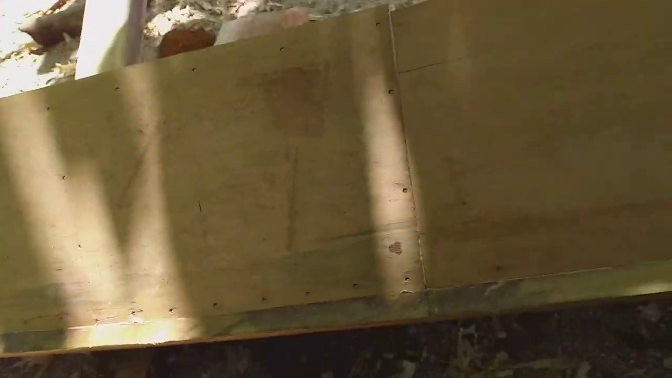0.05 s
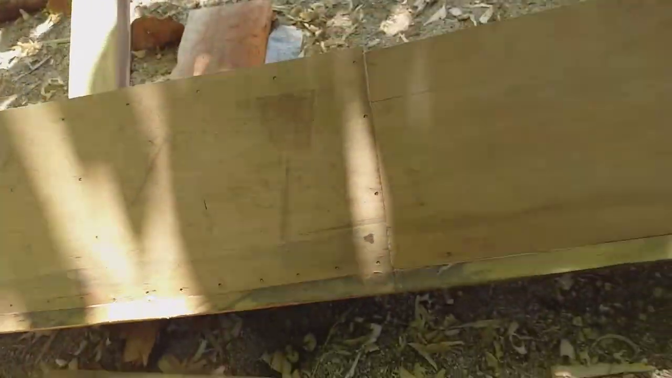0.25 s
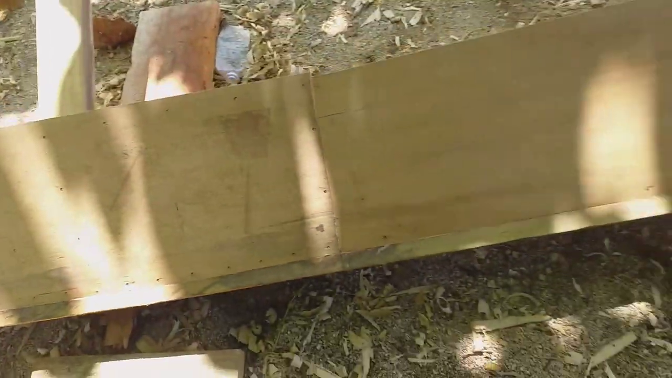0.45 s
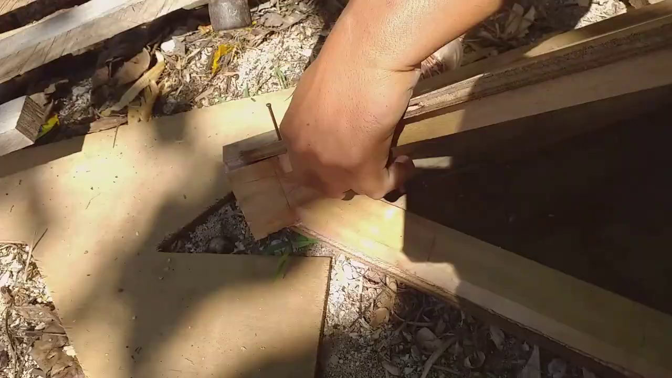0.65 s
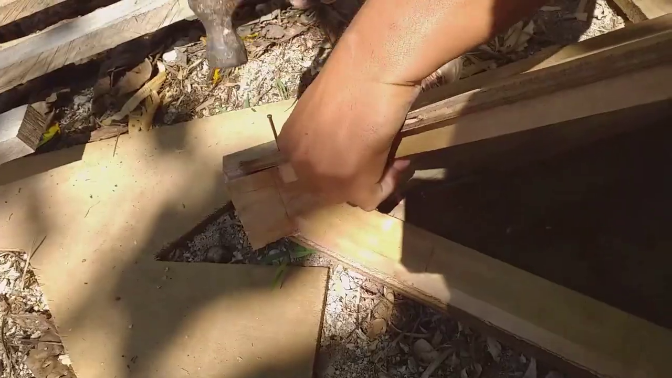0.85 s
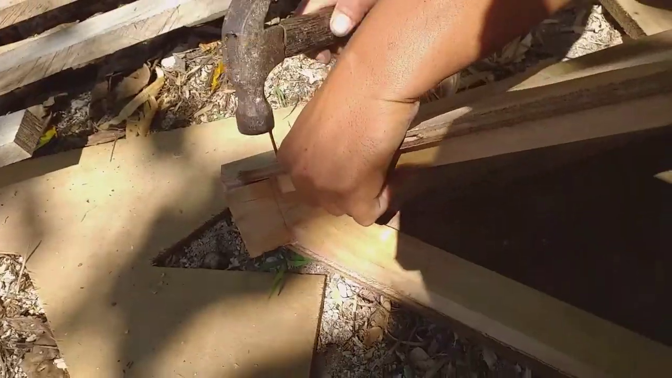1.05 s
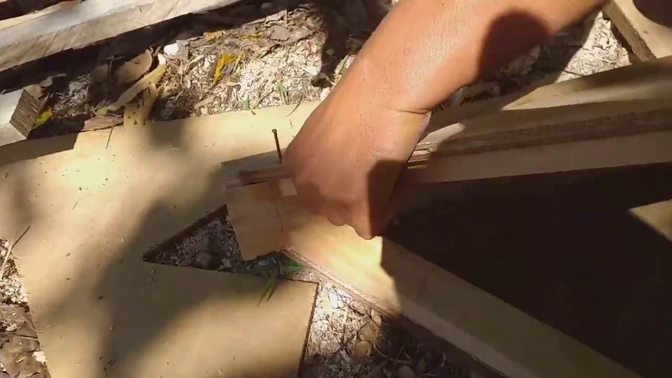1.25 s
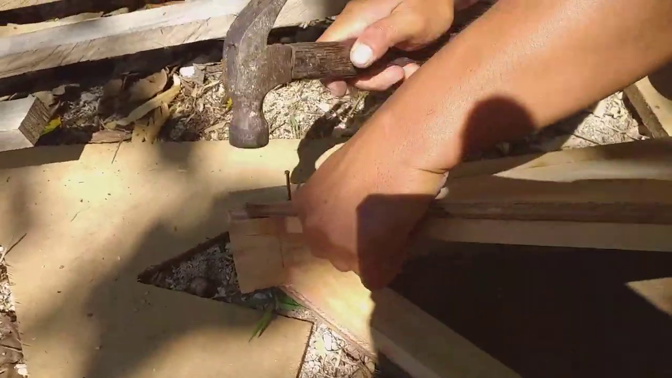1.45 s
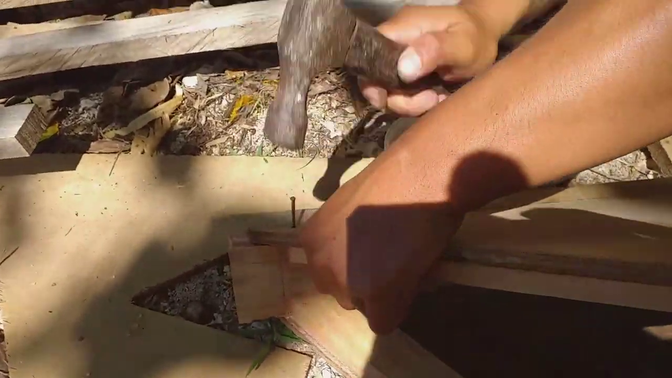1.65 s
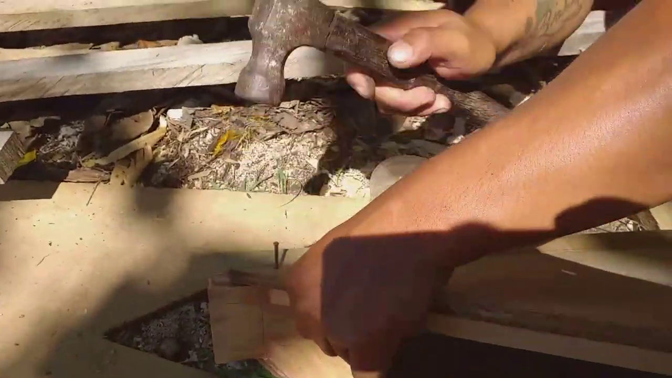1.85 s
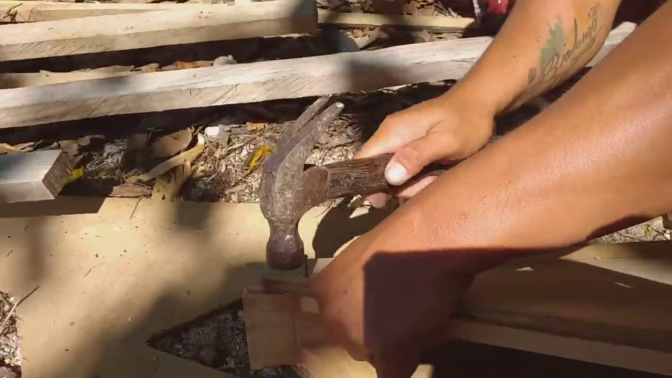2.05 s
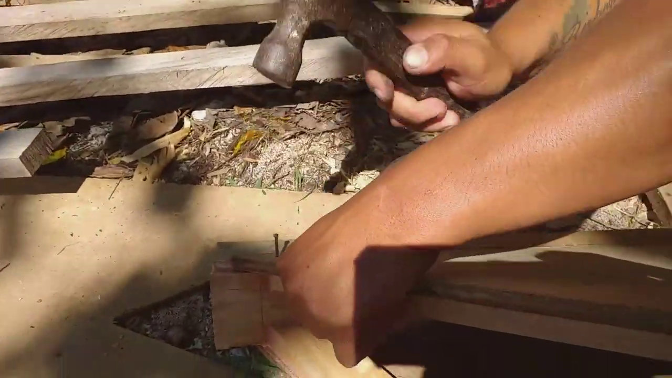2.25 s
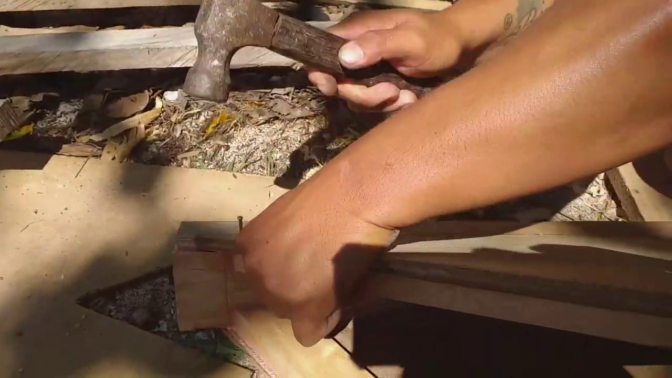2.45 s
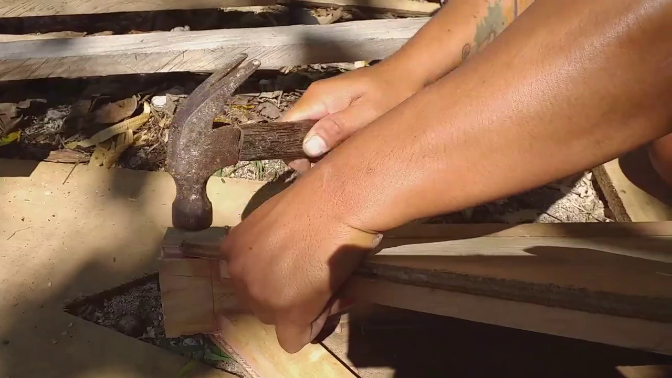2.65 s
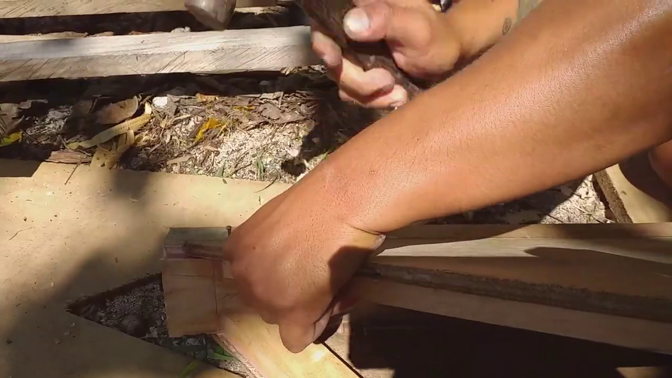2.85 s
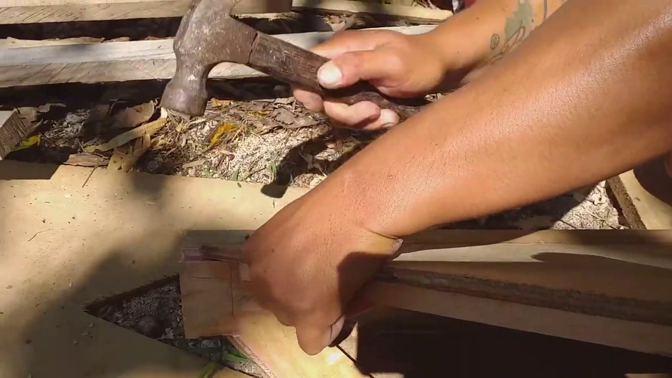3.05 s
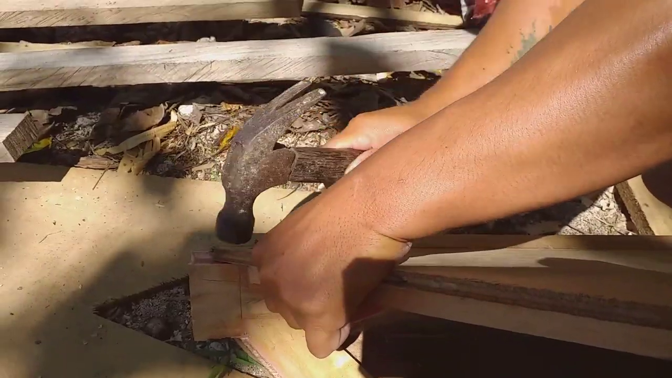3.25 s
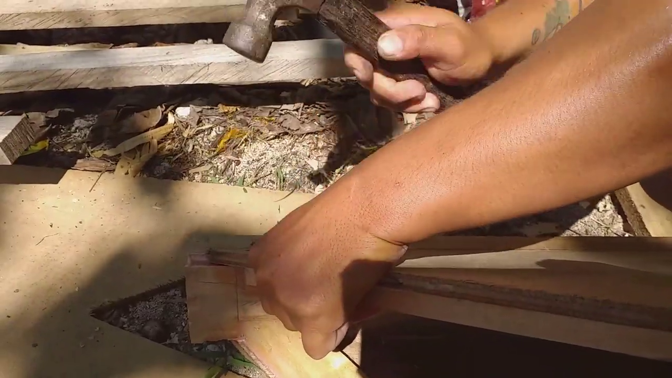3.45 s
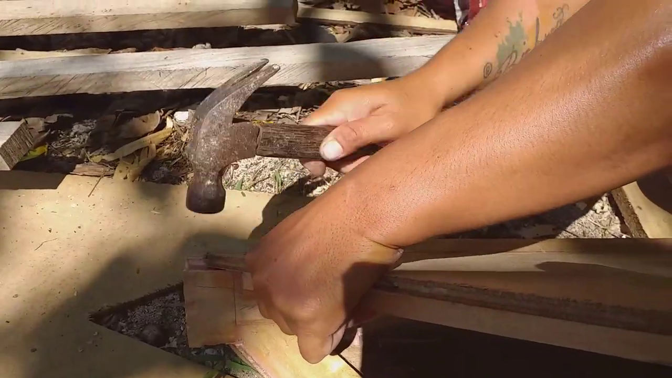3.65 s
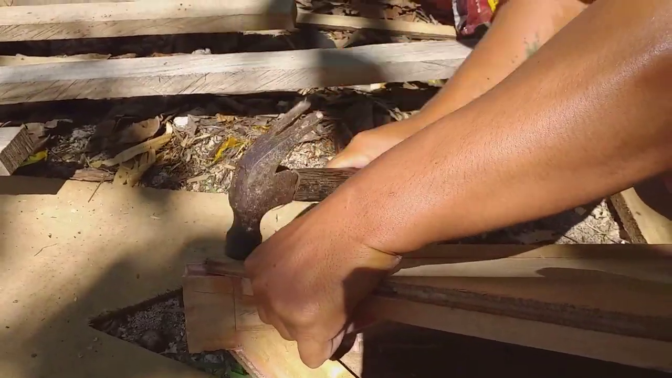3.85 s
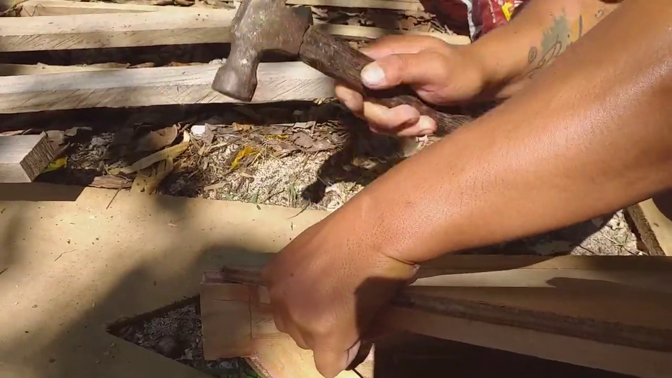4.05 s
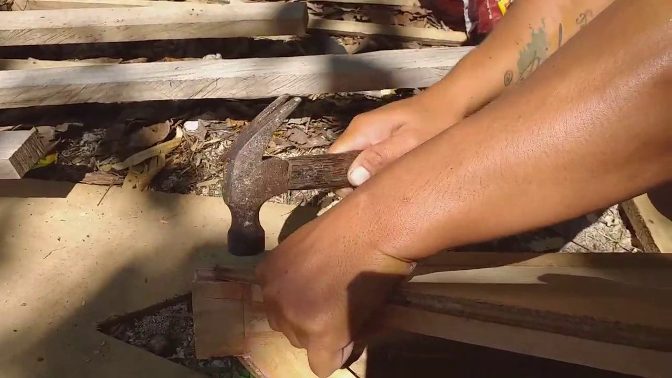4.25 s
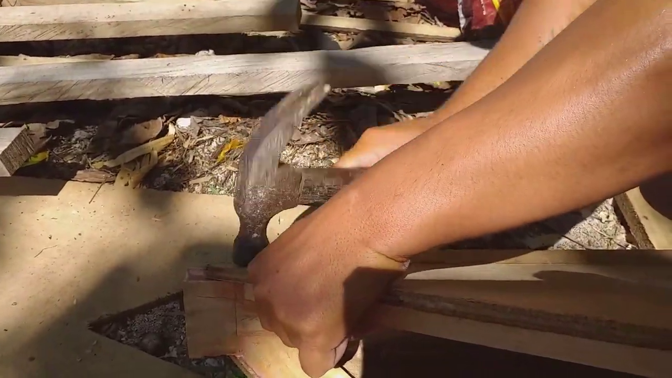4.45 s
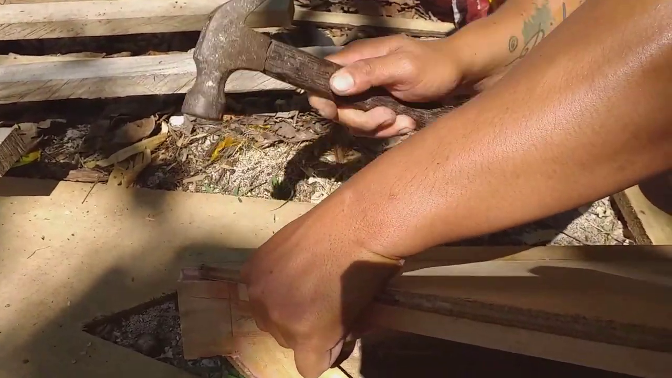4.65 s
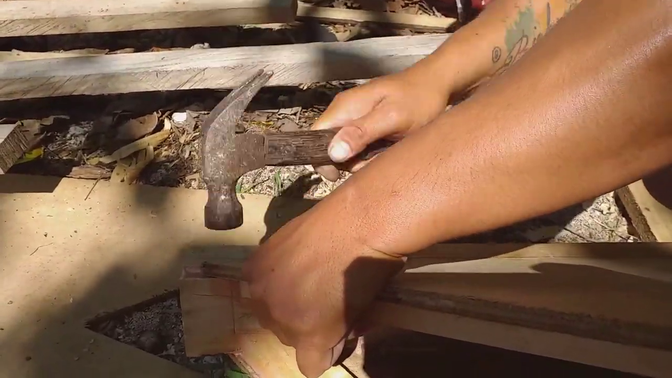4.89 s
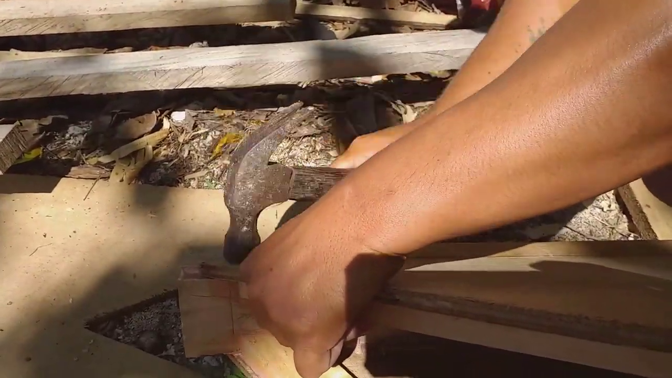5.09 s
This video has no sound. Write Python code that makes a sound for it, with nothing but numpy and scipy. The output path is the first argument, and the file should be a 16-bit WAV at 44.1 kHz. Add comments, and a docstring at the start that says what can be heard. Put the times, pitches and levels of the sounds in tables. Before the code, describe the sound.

Feet rustle briefly in shavings, then close, even hammer strikes crack on a nail and knock through a wooden frame.

```python
"""Hammering a nail into a boat frame

A claw hammer hits a nail about three times a second, close to a small camera in a yard. Each blow is
a crack of steel and a knock of the wooden frame, which loses its bite and answers more deeply as the
nail sinks. Four of the last blows knock twice. At first, someone shuffles through wood shavings and
fingers bump the camera."""
import sys
import numpy as np
from scipy import signal
from scipy.fft import rfft, irfft, next_fast_len
from scipy.io import wavfile
from scipy.ndimage import map_coordinates

SR = 44100
rng = np.random.default_rng(int(sys.argv[2]) if len(sys.argv) > 2 else 0)


def log_audio(samples):
    """Write samples as a 16-bit WAV file to the path given in sys.argv[1]."""
    # one column per channel
    frames = np.atleast_2d(samples).T
    # limit to full scale, then quantise
    limited = np.clip(frames, -1, 1)
    pcm = np.round(limited * 32767).astype(np.int16)
    wavfile.write(sys.argv[1], SR, pcm)


N = 225770
TIME = np.arange(N) / SR  # seconds since the start
AGE = np.arange(SR // 2) / SR  # seconds since a hit

# Table levels compare rows; each layer adds its own gain. A decay is the time to fade by 60 dB.
# hammer blows: (time [s], crack [dB], thud [dB], frame [dB], hollow ring [dB], block [dB], steel [dB])
BLOWS = [(0.756, -10.5, -41.5, -11, -14.5, -29.5, -52.5), (1.0682, -7, -39.5, -19, -11.5, -24, -51),
         (1.3871, -7, -42.5, -19, -13, -25.5, -49), (1.7092, -6.5, -42, -21, -19, -30, -46),
         (2.0296, -7.5, -23, -17.5, -24.5, -19.5, -48.5), (2.337, -8, -32, -12, -17, -21, -37.5),
         (2.6397, -7.5, -28.5, -13.5, -19, -19.5, -31), (2.9423, -7.5, -30, -19, -18.5, -9.5, -26),
         (3.2683, -8, -25.5, -14.5, -12.5, -21, -29), (3.5839, -5.5, -25.5, -12, -8, -20, -35),
         (3.8896, -7.5, -33.5, -10.5, -7, -16.5, -41), (4.1913, -8.5, -22, -8, -8, -14.5, -41.5),
         (4.4956, -6, -26, -11, -8.5, -14.5, -49), (4.7991, -5.5, -30.5, -7, -5, -16, -39.5),
         (5.1137, -8, -39, -5, 1, -12.5, -47.5)]
# second hits once the nail is nearly in: (time [s], frame [dB], clack [dB])
REBOUNDS = [(3.9116, -17, -14), (4.2094, -16, -19), (4.5119, -15.5, -20.5), (4.8174, -15.5, -17)]
# the tones that struck things ring with: (pitch [Hz], level [dB], decay [s])
WOOD_TONES = [(102, -20, 0.16), (136, -13.5, 0.23), (158, -11.5, 0.2), (196.6, -5, 0.086), (236.5, 6, 0.12),
              (259.9, -2.5, 0.16), (347.2, 8, .09), (381.8, 0, 0.17), (391.6, 3.5, 0.12),
              (468.5, -2.5, 0.093), (531.8, 9, 0.074), (583, 6.5, 0.049), (686, -9, 0.086), (775, 0, .05),
              (845, 1, .06), (900, -1, .06), (968, -3, .055), (1065.3, 7.5, 0.053), (1143, -1, 0.032),
              (1375, -4, .06), (1636, 2, 0.05), (1907, -6, 0.068), (2060, -7.5, 0.073)]  # the frame and the nailed block
PING_TONES = [(4942, 3, .11), (5938, 8, .125)]  # ringing steel
CLINK_TONES = [(3895, -5, 0.026), (4900, -11, 0.01), (5000, -4, 0.023), (6300, -11, 0.038),
               (6910, -12, 0.048), (7810, -7.5, 0.033), (11630, -24, 0.031), (12300, -17, .025)]  # the nail and hammer face, which stop quickly
# how long each part of a noise burst lasts: (frequency [Hz], decay [s])
CRACK_DECAYS = [(500, 0.1), (2000, 0.033), (5000, 0.023), (12000, 0.02)]
ECHO_DECAYS = [(100, 0.32), (400, 0.2), (1000, .2), (5000, .22), (12000, .19)]
# noise colours, or how strong a noise is from low to high: (frequency [Hz], level [dB per Hz])
CRACK_COLOUR = [(150, -27.5), (600, -14), (1100, -3.5), (1700, -9), (2700, -5), (3200, -8), (4000, 1),
                (5500, 2), (7700, 1.5), (9200, -15), (12000, -7), (15500, -9)]  # steel hitting steel
NEAR_ECHO_COLOUR = [(60, -19), (150, 3), (280, 12), (420, -3), (700, -12.5), (1700, -3.5), (2600, -9.5),
                    (4000, -2.5), (7600, -2.5), (9200, -16.5), (15000, -11)]  # sound scattered by the yard
FAR_ECHO_COLOUR = [(30, -18), (85, 20), (200, -2), (450, -10.5), (1000, -9), (2500, -7.5), (5000, -2.5),
                   (7800, -5), (9200, -16.5), (15000, -18.5)]  # sound coming back from farther off
SCRAPE_COLOUR = [(150, -22.5), (400, -4), (900, -5), (1600, -2), (2400, -6), (4000, -20)]  # the low part of a dragging foot
RUSTLE_COLOUR = [(1500, -28.5), (2600, -5), (4500, 1), (7800, 1.5), (9500, -23), (14000, -42)]  # shifting shavings
FIZZ_COLOUR = [(6000, -25), (9000, -5.5), (13000, 0.5), (15500, -7)]  # their highest hiss
SNAP_COLOUR = [(500, -13), (1500, -4.5), (3500, 0), (7000, 2.5), (9500, -14.5), (15000, -16)]  # a breaking chip
RUMBLE_COLOUR = [(25, -20.5), (55, -4), (130, -4), (220, -15), (400, -26.5), (900, -43.5)]  # a hand on the camera
AIR_COLOUR = [(15, -28.5), (25, 2), (91, 0.5), (722, -26), (2120, -13), (2300, -23), (2700, -11.5),
              (2920, -10), (3340, -16.5), (8130, -16), (9050, -31), (15500, -26)]  # quiet outdoor air
# feet dragging through shavings: (time [s], half length [s], rustle [dB], fizz [dB])
FOOT_DRAGS = [(0.027, 0.028, -41, -58), (0.142, 0.061, -44, -64), (0.255, .02, -56, -41),
              (0.335, 0.016, -43.5, -34), (0.422, 0.31, -43.5, -48), (.57, 0.016, -42.5, -47),
              (0.695, 0.086, -42, -45.5)]
# chips breaking: (time [s], level [dB])
CHIP_SNAPS = [(0.041, -45), (0.114, -47), (0.168, -45), (0.239, -38), (0.326, -39), (0.4668, -23.5),
              (.574, -40.5), (0.645, -38)]
# fingers on the camera body: (time [s], level [dB], pitch [Hz], half length [s])
FINGER_BUMPS = [(0.387, -20, 179, 0.0069), (0.429, -5.5, 166.5, 0.0056), (0.445, -22.5, 108, 0.011),
                (.501, -14, 181, 0.0035), (.521, -20, 129, 0.01), (0.582, -4.5, 152, 0.0044),
                (.603, -21, 160, 0.0048), (0.696, -21.5, 164, 0.0073)]
# rumble of the hand moving the camera: (time [s], level [dB])
RUMBLE_LEVELS = [(0.0, -71), (0.122, -44), (0.298, -40.5), (0.6, -30), (0.622, -32.5), (0.75, -41.5)]
# faint, short swells of high hiss: (time [s], level [dB], centre frequency [Hz], half length [s])
HISS_SWELLS = [(0.177, -35.5, 13300, 0.043), (1.919, -57, 12930, 0.18), (1.917, -61, 6530, 0.095),
               (2.537, -63.5, 5900, .04), (3.83, -66.5, 3440, 0.046), (4.44, -67, 6980, 0.094)]

# Each blow sinks the nail one equal step, and the tone follows: (nail tall [dB], nail fully in [dB])
BITE_DB = (5, -3.5)  # the sharp edge of the crack near 4 kHz
# wood tones, added to the blow's crack level: clunk near 800 Hz, clack near 1 kHz, rap above 1.5 kHz
CLUNK_DB, CLACK_DB, RAP_DB = (-18.5, -9), (-12.5, -15.5), (-9.5, -21.5)
SWAY_DB = -13  # the lowest tones of the frame, at any nail depth
SETTLE_S, STILL_S = 0.745, 0.79  # shuffle, rumble and whirr die away between these times


def hammer():
    """Each blow cracks, sets the steel ringing, pushes the whole frame once and knocks the wood."""
    out = np.zeros(N)
    depths = np.linspace(0, 1, len(BLOWS))
    for depth, (start, crack_db, thud_db, frame_db, hollow_db, block_db, steel_db) in zip(depths, BLOWS):
        bite_db, clunk_db, clack_db, rap_db = [
            np.interp(depth, [0, 1], ends) for ends in (BITE_DB, CLUNK_DB, CLACK_DB, RAP_DB)]
        crack = amp(crack_db) * steel_crack(bite_db)
        ping = amp(steel_db + 5.5) * ring(PING_TONES, scatter_db=1, detune=0.0003).sum(axis=0)
        thud = amp(thud_db + 18) * rise(0.002) * fade(0.037) * np.sin(2 * np.pi * 88 * AGE)
        wood = wood_knock(SWAY_DB, frame_db, hollow_db, block_db,
                          crack_db + clunk_db, crack_db + clack_db, crack_db + rap_db, build_cycles=0.93)
        echo = amp(crack_db) * yard_echo()
        add(out, start, crack + ping + thud + wood + echo)
    return out


def steel_crack(bite_db):
    """Steel hits steel with a burst of noise and a short clink. A tall nail gives it more bite."""
    def bite(hz):
        return bite_db * bell(np.log(hz / 3800), 0, 0.34)

    burst = noise_burst([(hz, db + bite(hz)) for hz, db in CRACK_COLOUR], CRACK_DECAYS)
    tones = [(hz, db + bite(hz), decay) for hz, db, decay in CLINK_TONES]
    clink = ring(tones, scatter_db=1, detune=0.041).sum(axis=0)
    return rise(0.0013) * (amp(8) * burst + amp(-1) * clink)


def wood_knock(sway_db, frame_db, hollow_db, block_db, clunk_db, clack_db, rap_db, build_cycles):
    """The wood rings with many tones. Long, low waves need more time to spread through the frame."""
    hz = np.transpose(WOOD_TONES)[0][:, None]
    # strength of each group of tones: (pitch [Hz], level [dB])
    frame = [(165, sway_db), (235, frame_db), (270, frame_db),
             (345, (frame_db + hollow_db) / 2 - 1.65), (380, hollow_db), (450, hollow_db)]
    block = [(520, block_db), (620, block_db), (760, clunk_db), (920, clunk_db),
             (1060, clack_db), (1150, clack_db), (1600, rap_db)]
    strength = amp(value_at(frame + block, hz))
    direction = (-1) ** np.arange(len(hz))[:, None]  # neighbouring tones start opposite ways
    tones = ring(WOOD_TONES, scatter_db=2.5, detune=0.012)
    return np.sum(direction * strength * rise(build_cycles / hz) * tones, axis=0)


def rebounds():
    """The hammer lands again, more softly: only wood sounds, with a dull echo from the yard."""
    out = np.zeros(N)
    dull_colour = [(100, -10), (330, -1), (600, -12), (1300, -17), (2200, -20.5), (4000, -36)]
    for start, frame_db, clack_db in REBOUNDS:
        wood = wood_knock(frame_db, frame_db, frame_db, frame_db - 2.5,
                          clack_db - 0.5, clack_db - 1, clack_db - 7.5, build_cycles=1)
        echo = amp(frame_db - 7) * rise(0.02) * noise_burst(dull_colour, ECHO_DECAYS)
        add(out, start, wood + echo)
    return out


def yard_echo():
    """Timber and ground scatter a blow back; a fainter echo comes from farther off."""
    near = amp(-13.5) * rise(0.018) * noise_burst(NEAR_ECHO_COLOUR, ECHO_DECAYS)
    far = amp(-35) * rise(0.04) * fade(0.65) * noise(FAR_ECHO_COLOUR, len(AGE))
    return near + far


def shuffle():
    """Each drag of a foot makes a swell of tiny crackles in the shavings."""
    when, half_length, rustle_db, fizz_db = np.transpose(FOOT_DRAGS)[:, :, None]
    swells = bell(TIME, when, half_length)
    rustle = np.sum(amp(rustle_db) * swells, axis=0)
    fizz = np.sum(amp(fizz_db) * swells, axis=0)
    scrape = rustle * amp(2.5 - 14 * TIME)  # grows fainter over the opening
    crackle_db = 2.7 * wobble(450)  # a random level, nearly steady, shared by all three layers
    out = np.zeros(N)
    for level, colour in (scrape, SCRAPE_COLOUR), (rustle, RUSTLE_COLOUR), (fizz, FIZZ_COLOUR):
        flicker = amp(crackle_db + 1.6 * wobble(70))
        out += level * normalise(flicker * noise(colour, N))
    return out


def snaps(crackles_per_s=30):
    """Chips snap, and single shavings break underfoot at random moments."""
    out = np.zeros(N)
    for start, db in CHIP_SNAPS:
        add(out, start, amp(db + 8.5) * fade(0.021) * noise(SNAP_COLOUR, len(AGE)))
    for when, size in rng.random((round(crackles_per_s * SETTLE_S), 2)):
        crackle = fade(0.008) * noise([(1500, -15), (6000, -0.5), (14000, -3.5)], len(AGE))
        add(out, when * SETTLE_S, amp(-40.5 + 11 * size) * crackle)
    return out


def finger_bumps():
    """Soft fingertips rock the camera body once or twice, with a short dull tap at the peak."""
    out = np.zeros(N)
    for when, db, hz, half_length in FINGER_BUMPS:
        touch = bell(TIME, when, half_length)
        rocking = np.cos(2 * np.pi * hz * (TIME - when))
        tap = noise([(150, -14), (330, 6), (520, -12.5), (900, -37)], N)
        out += amp(db) * touch * (rocking + amp(-14.5) * touch * tap)
    return out


def hand_rumble():
    """A hand moving the camera makes a low rumble."""
    level_db = np.interp(TIME, *np.transpose(RUMBLE_LEVELS))
    return amp(level_db) * noise(RUMBLE_COLOUR, N)


def squeak():
    """One faint, short squeak at a nearly steady pitch."""
    pitch_hz = 725 + 7 * wobble(30)
    tone = np.sin(2 * np.pi * np.cumsum(pitch_hz) / SR)
    return amp(-40) * bell(TIME, 0.215, 0.047) * tone


def whirr(hz=1588):
    """A faint whirr, made of noise close to one pitch, fades behind the shuffling."""
    colour = [(hz / 1.2, -40), (hz, 0), (hz * 1.2, -40), (hz * 2, -80)]
    return amp(-48.5 - 17 * TIME) * noise(colour, N)


def hiss_swells():
    """Faint, short swells of narrow high hiss come and go."""
    out = np.zeros(N)
    for when, db, hz, half_length in HISS_SWELLS:
        hiss = noise([(hz / 2, -40), (hz / 1.25, -8), (hz, 0), (hz * 1.25, -8), (hz * 2, -40)], N)
        out += amp(db) * bell(TIME, when, half_length) * hiss
    return out


def air():
    """Quiet outdoor air at a nearly steady level."""
    return amp(-68.5 + 1.2 * wobble(4)) * noise(AIR_COLOUR, N)


def ring(tones, scatter_db, detune):
    """Fading tones, one a row. Strength and pitch shift at random, as no two hits land on one spot."""
    hz, db, decay = np.transpose(tones)[:, :, None]
    level_shift, pitch_shift = rng.standard_normal((2, len(hz), 1))
    waves = np.sin(2 * np.pi * hz * (1 + detune * pitch_shift) * AGE)
    return amp(db + scatter_db * level_shift) * fade(decay) * waves


def noise(colour, size):
    """Noise of the given colour, with an average power of 1."""
    padded = next_fast_len(size)
    gains = amp(value_at(colour, np.fft.rfftfreq(padded, 1 / SR)))
    white = rfft(rng.standard_normal(padded))
    return normalise(irfft(white * gains, padded)[:size])


def noise_burst(colour, decays):
    """A burst of noise in which each frequency dies at its own speed."""
    hz, age, bands = signal.stft(noise(colour, len(AGE)), SR, nperseg=128)
    fading = bands * fade(value_at(decays, hz)[:, None], age)
    return signal.istft(fading, SR, nperseg=128)[1][:len(AGE)]


def wobble(rate):
    """A random curve read only over its very start, so it stays close to one random value for the whole sound."""
    return map_coordinates(rng.standard_normal(int(N * rate / SR) + 4), [TIME * rate / SR])


def fade(decay, age=AGE):
    """A fall of 60 dB every `decay` seconds."""
    return np.exp(-np.log(1000) * age / decay)


def rise(seconds):
    """A smooth climb from 0 to 1."""
    return 1 - np.exp(-(AGE / seconds) ** 2)


def bell(x, centre, half_width):
    """A smooth hill that peaks at 1."""
    return np.exp(-((x - centre) / half_width) ** 2)


def value_at(points, hz):
    """Read between (frequency, value) points, with octaves about evenly spaced."""
    frequencies, values = np.transpose(points)
    return np.interp(np.log(hz + 1), np.log(frequencies + 1), values)


def amp(db):
    """Turn decibels into a multiplier."""
    return 10 ** (np.asarray(db) / 20)


def normalise(x):
    """Scale a sound to an average power of 1."""
    return x / np.sqrt(np.mean(x ** 2) + 1e-20)


def add(track, start, sound):
    """Mix a sound into the track at `start` seconds."""
    part = track[max(round(start * SR), 0):][:len(sound)]
    part += sound[:len(part)]


def scene():
    """The hammering and the small sounds around it, over quiet air, in one channel."""
    hammering = hammer() + rebounds()
    settling = np.interp(TIME, [SETTLE_S, STILL_S], [1, 0])
    opening = (shuffle() + hand_rumble() + whirr()) * settling + snaps() + squeak() + finger_bumps()
    return (hammering + opening + hiss_swells() + air())[None]


def record(dry):
    """The camera holds the loudest blows down, and also loses deep bass and the highest treble."""
    bass_hz, treble_hz, ceiling = 44, 15500, 0.92
    thin = signal.sosfilt(signal.butter(4, bass_hz, "highpass", fs=SR, output="sos"), dry)
    squashed = thin / (1 + np.abs(thin / ceiling) ** 4) ** (1 / 4)  # rounds off the loudest peaks
    return signal.sosfilt(signal.butter(24, treble_hz, fs=SR, output="sos"), squashed)


dry = scene()
out = record(dry)
log_audio(out)
```